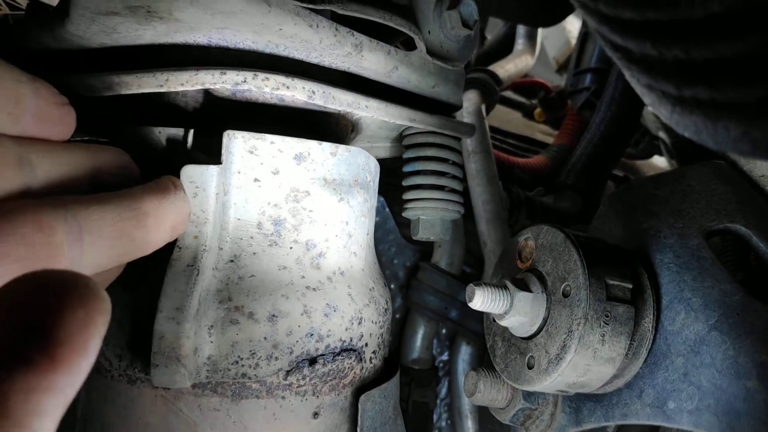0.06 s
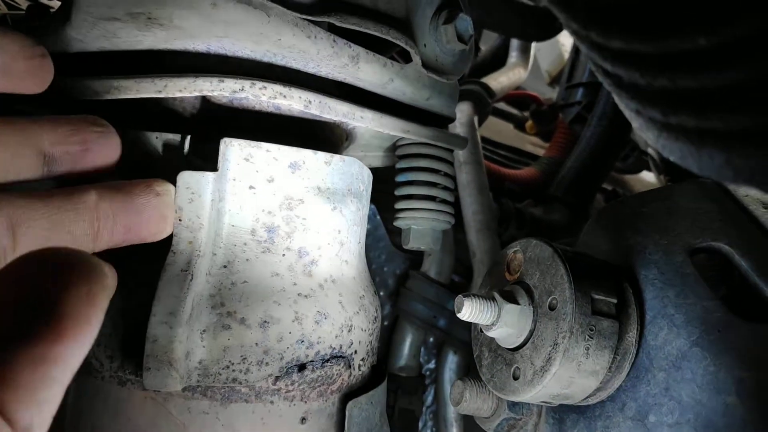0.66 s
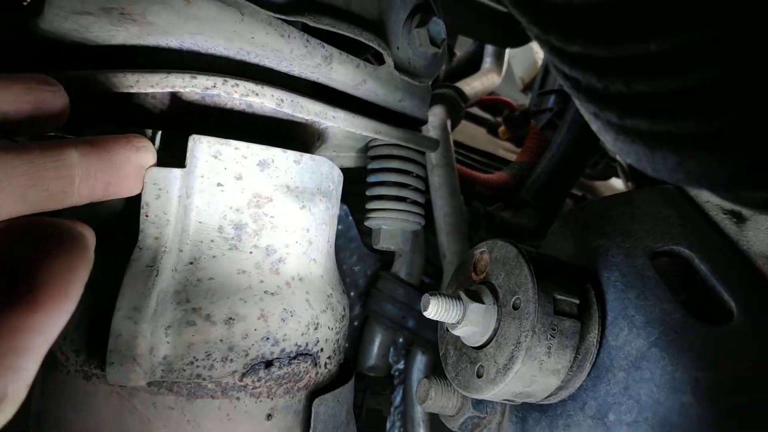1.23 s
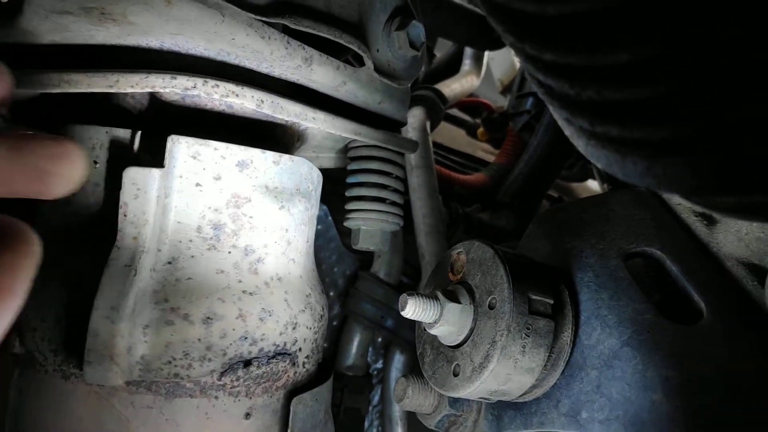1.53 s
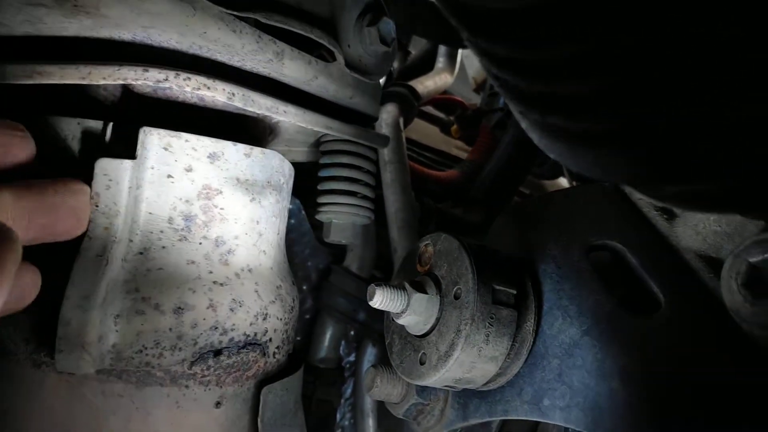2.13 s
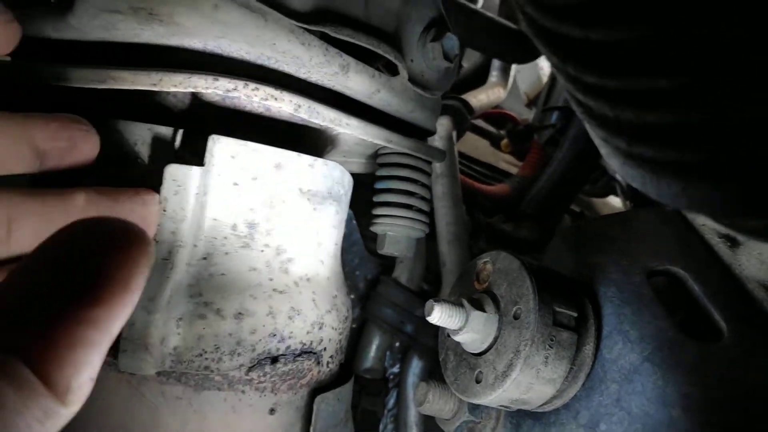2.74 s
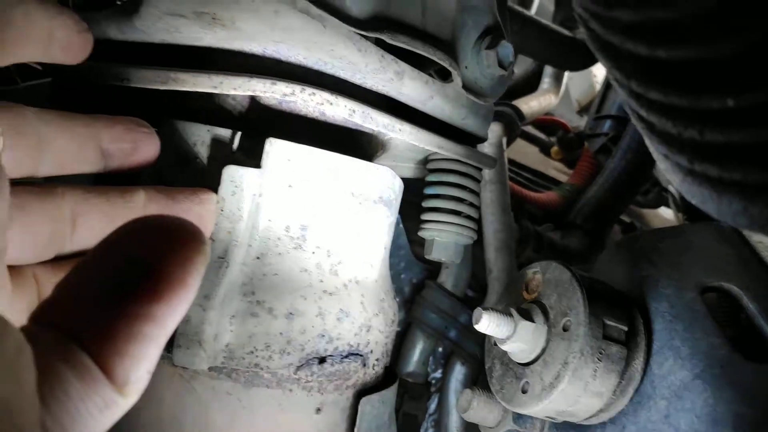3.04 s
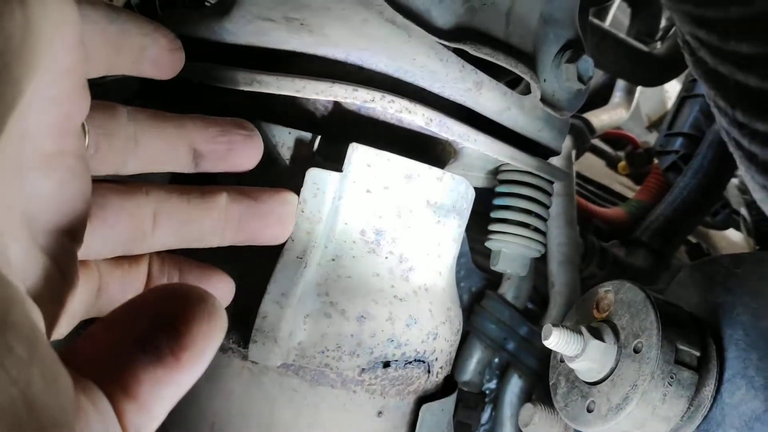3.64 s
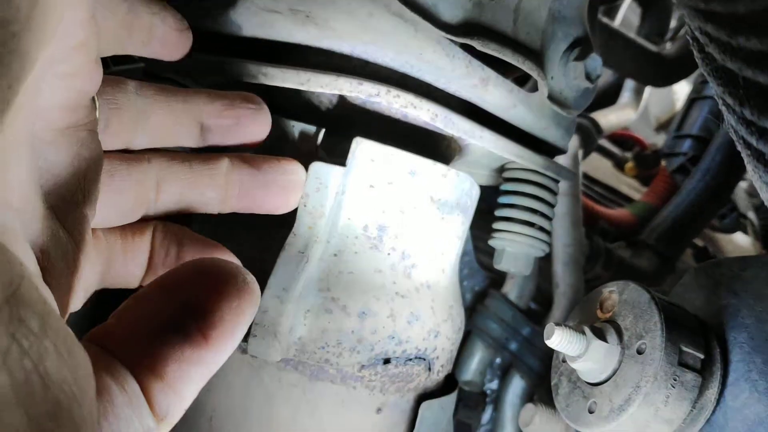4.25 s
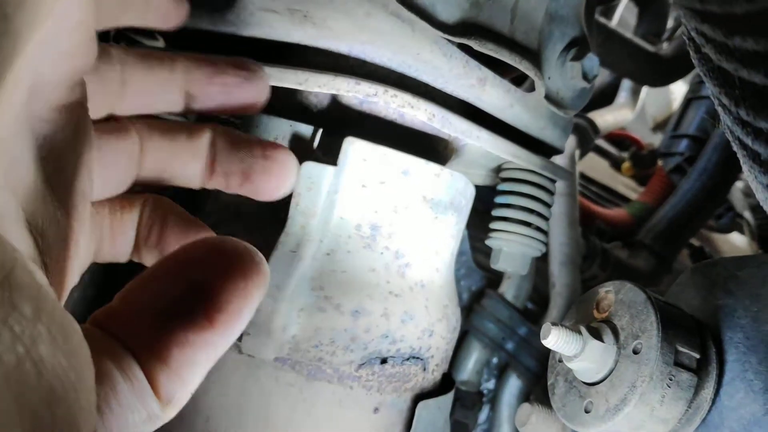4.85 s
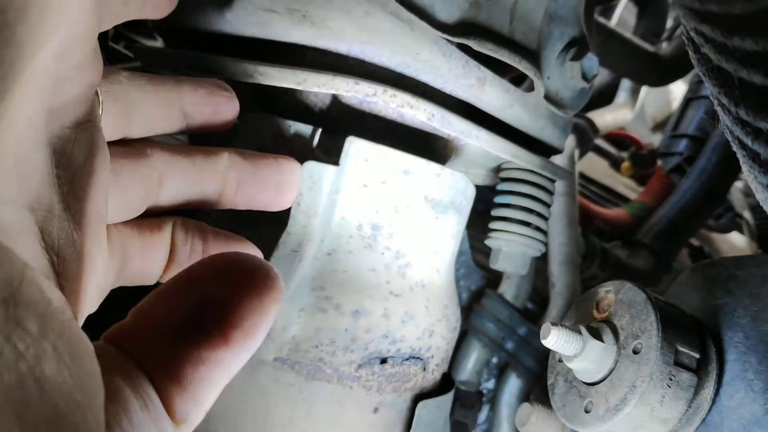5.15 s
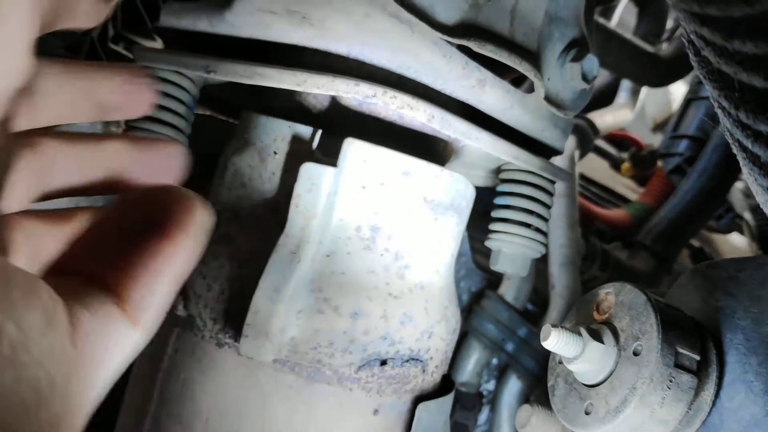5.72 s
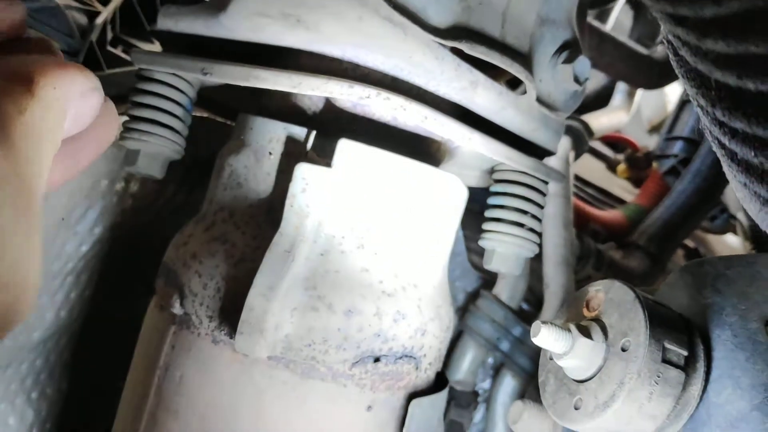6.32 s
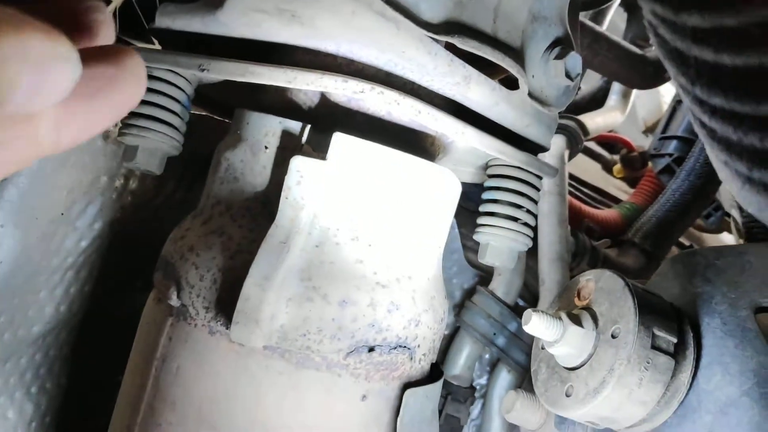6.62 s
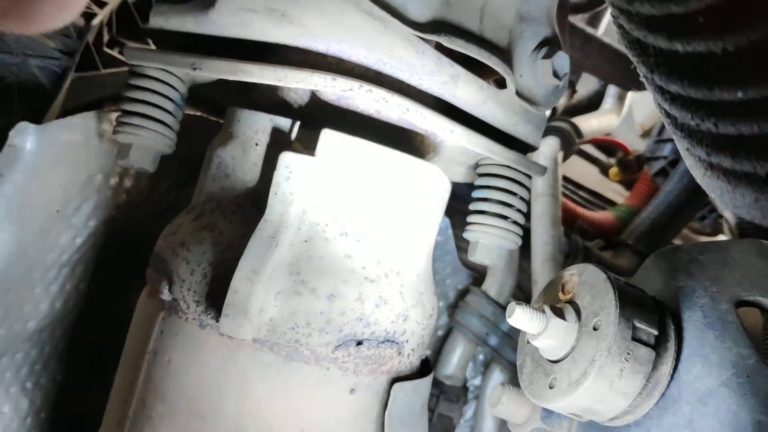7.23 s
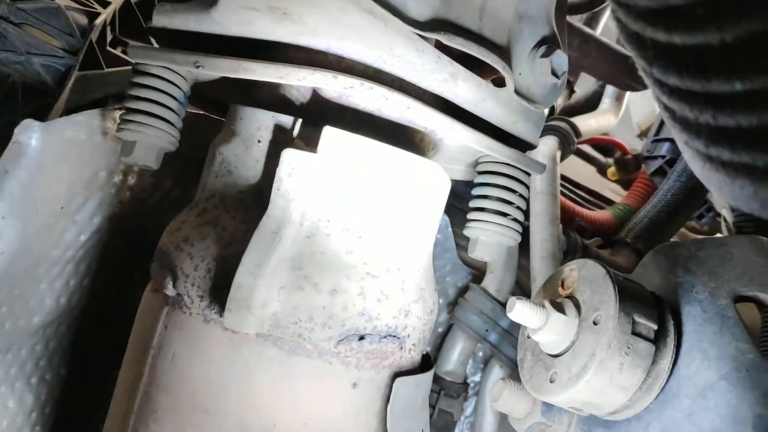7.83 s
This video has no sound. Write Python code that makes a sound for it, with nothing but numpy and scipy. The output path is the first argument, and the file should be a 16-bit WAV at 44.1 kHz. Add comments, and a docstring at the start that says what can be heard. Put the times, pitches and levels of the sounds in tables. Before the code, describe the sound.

Under a car, a fingernail flicks a loose, thin metal heat shield close to the microphone. Three sharp, ringing clangs come with uneven gaps, then after a pause four more follow about half a second apart. Most carry a quick chatter as the sheet slaps the exhaust pipe. Afterwards a sleeve rustles softly as the arm draws back. A faint low rumble and hum continue throughout.

```python
"""Flicked exhaust heat shield

Under a car, a fingernail flicks the loose shield and rings the thin sheet. After a hard flick the sheet
slaps the pipe behind it and chatters, and both ring on. The finger brushes the metal and once skids off.
A sleeve rustles as the arm draws back; rumble, hum and faint squeaks lie below. A limiter ducks peaks."""
import sys
import numpy as np
from scipy import signal
from scipy.fft import rfft, irfft, next_fast_len
from scipy.io import wavfile
from scipy.ndimage import uniform_filter1d, minimum_filter1d, map_coordinates

SR = 44100
rng = np.random.default_rng(int(sys.argv[2]) if len(sys.argv) > 2 else 0)


def waveform_to_disk(signal):
    """Save audio, clipped to [-1, 1], as 16-bit WAV at the path in sys.argv[1]."""
    frames = np.transpose(np.atleast_2d(signal))
    scaled = np.clip(frames, -1, 1) * 32767
    samples = np.round(scaled).astype(np.int16)
    wavfile.write(sys.argv[1], SR, samples)


N = 351918
TOP_HZ = 14250

# Nail strikes. Each row: start in seconds, level in dB, brightness in dB/octave, favoured band in Hz.
NAIL_FLICKS = [(0.49, -32.5, -1.5, 7400), (0.8191, -5.5, 3, 9360), (1.5223, -22.5, -1.5, 4830),
               (1.5301, -1.5, 0, 4080), (1.822, -35.5, 1.5, 8000), (1.992, -25, -1, 2323),
               (2.463, -0.5, 2, 12540), (3.7952, -4.5, -1, 8100), (4.333, -4, -0.5, 7600),
               (4.8174, -3.5, 0, 7070), (5.3405, -5.5, 8, 7620)]
# Stereo width. Each row: frequency in Hz, angle between the channels in radians.
STEREO_SPREAD = [(200, .25), (600, .9), (1100, 1.2), (2200, 1.75), (4700, 1.77), (8000, 1.9), (14000, 0.65)]
# Rubbing of cloth or skin. Each row: frequency in Hz, relative density in dB.
RUB_SPECTRUM = [(1470, -7), (2500, -10.5), (4880, -9.5), (5570, -9.5), (6000, -6), (7930, -1), (10300, -11),
                (13700, -10.5), (14500, -7)]
# Its balance. Each row: frequency in Hz, left over right in dB.
RUB_PAN = [(2000, -6), (4400, -5.5), (8000, -14), (13000, 7.5)]


def amp(db):
    """Decibels to gain."""
    return 10 ** (np.asarray(db) / 20)


def unit(x):
    """Scale to rms 1."""
    return x / np.sqrt(np.mean(x ** 2) + 1e-20)


def along(points, hz):
    """Read (Hz, value) points on a log axis."""
    f, v = np.transpose(points)
    return np.interp(np.log(hz + 1), np.log(f + 1), v)


def wobble(rate_hz):
    """Smooth random curve, rate_hz knots a second."""
    knots = rng.standard_normal(int(N * rate_hz / SR) + 4)
    return map_coordinates(knots, [np.arange(N) * rate_hz / SR])


def filtered(x, response):
    """Apply a gain given as a function of Hz."""
    n = x.shape[-1]
    m = next_fast_len(n + 8192)
    return irfft(rfft(x, m) * response(np.fft.rfftfreq(m, 1 / SR)), m)[..., :n]


def panned(db):
    """Left and right gains of mean power 1."""
    g = amp([db / 2, -db / 2])
    return g / np.sqrt(np.mean(g ** 2, axis=0))


def noise(spectrum, n, pan=((1000, 0),)):
    """Stereo noise of rms 1: alike in the bass, wider in the treble."""
    def mid_side_gains(hz):
        angle = np.minimum(along(STEREO_SPREAD, hz), np.pi / 2) / 2
        return np.array([np.cos(angle), np.sin(angle)])

    mid, side = filtered(rng.standard_normal((2, n)), mid_side_gains)
    stereo = np.array([mid + side, mid - side])
    return unit(filtered(stereo, lambda hz: amp(along(spectrum, hz)) * panned(along(pan, hz))))


def burst(spectrum, t60_s):
    """Decaying noise with a spectrum of (Hz, dB) points."""
    t = np.arange(SR // 5) / SR
    return noise(spectrum, len(t)) * amp(-60 * t / t60_s)


def colour_db(hz, tilt_db_oct, favoured_hz, favour_db=4, width_oct=0.27):
    """Each contact has its own brightness; the spot where it lands favours one band."""
    tilt_db = tilt_db_oct * np.log2(np.maximum(hz, 1000) / 4000)
    return tilt_db + favour_db * np.exp(-.5 * (np.log2(hz / favoured_hz) / width_oct) ** 2)


def add(track, start_s, sound):
    """Mix a sound into the track."""
    part = track[:, max(round(start_s * SR), 0):][:, :sound.shape[-1]]
    part += sound[..., :part.shape[1]]


def background(settle_s=1.7):
    """Rumble that starts louder and settles, open air, and a distant machine's wavering hum."""
    # Noise spectra. Each row: frequency in Hz, relative density in dB.
    rumble_spectrum = [(15, -5), (27, 3.5), (38, -1.5), (52, 6), (75, 0), (110, 0), (150, -12.5),
                       (220, -20.5), (400, -58)]
    air_spectrum = [(100, 1.5), (170, -2.5), (300, -3.5), (600, -11), (950, -9), (1500, -17), (2500, -27.5),
                    (4000, -32.5), (8000, -31), (14000, -38.5)]
    # Machine tones. Each row: frequency in Hz, level in dB.
    hum_tones = [(86.1, -60.5), (113, -56)]
    t = np.arange(N) / SR
    rumble = amp(-50.5 + 8.5 * np.exp(-t / settle_s) + 1.23 * wobble(4.2)) * noise(rumble_spectrum, N)
    air_db = np.interp(t, [0, 1.5, 3, 8], [-53.5, -54, -55, -56]) + 0.89 * wobble(5.3)
    out = rumble + amp(air_db) * noise(air_spectrum, N)
    for hz, db in hum_tones:
        peak = np.sqrt(2) * amp(db + 1.1 * wobble(4.5))
        out += peak * np.sin(2 * np.pi * hz * t + 0.84 * wobble(5.6))
    return out


def squeaks(pitch_arch=.09, roughness=.022):
    """Faint, unsteady squeaks whose pitch arches with their level."""
    # Each row: start in seconds, length in seconds, top pitch in Hz, level in dB.
    squeak_events = [(3.022, 0.267, 895, -59), (6.869, .3, 1645, -66)]
    out = np.zeros((2, N))
    for s, length_s, top_hz, db in squeak_events:
        arch = np.sin(np.linspace(0, np.pi, int(length_s * SR)))
        hz = top_hz * (1 - pitch_arch * (1 - arch) + roughness * wobble(146)[:len(arch)])
        add(out, s, amp(db) * arch * np.sin(2 * np.pi * np.cumsum(hz) / SR))
    return out


def pull_speed(n, peak_share=0.26):
    """One pull of the arm over n samples: picks up quickly, eases off."""
    progress = np.interp(np.linspace(0, 1, n), [0, peak_share, 1], [0, .5, 1])
    return np.abs(np.sin(np.pi * progress)) ** 0.77


def sleeve(crackles_per_s=26, stretched_at_s=6.8, flutter_db=1.2):
    """Cloth speed drives the hiss and, until the sleeve has stretched, the crackle of its folds."""
    # Arm pulls. Each row: start in seconds, length in seconds, level in dB, favoured band in Hz.
    pulls = [(5.742, 0.34, -60, 5960), (5.99, 0.22, -55, 7500), (6.16, 0.85, -53, 7500),
             (6.959, 0.3, -55, 7500), (7.217, .19, -52.5, 12000), (7.386, .12, -52, 13000),
             (7.519, 0.12, -52, 9030), (7.721, .045, -62.5, 7500)]
    hiss, speed = np.zeros((2, N)), np.zeros((1, N))
    for s, length_s, db, favoured_hz in pulls:
        slide = amp(db) * pull_speed(int(length_s * SR))
        cloth = filtered(noise(RUB_SPECTRUM, len(slide), RUB_PAN),
                         lambda hz: amp(colour_db(hz + 1, 0, favoured_hz, favour_db=3.5, width_oct=.48)))
        add(hiss, s, slide * unit(cloth))
        add(speed, s, slide)
    buckles = (rng.random(N) < crackles_per_s / SR) & (np.arange(N) / SR < stretched_at_s)
    folds = buckles * amp(3 + 3 * rng.standard_normal(N))
    snap = burst([(800, -18), (2000, 0), (3200, -3), (5000, 5), (7000, -19)], t60_s=0.019)
    crackle = signal.fftconvolve(folds * speed, snap, axes=1)[:, :N]
    return amp(flutter_db * wobble(45)) * hiss + crackle


def hand():
    """The fingertip brushes the shield; hand and cuff tick."""
    # Each row: start in seconds, length in seconds, level in dB.
    brushes = [(0.589, 0.053, -64.5), (1.122, .054, -58), (1.198, 0.24, -67), (1.823, .056, -57),
               (1.971, .05, -54), (4.076, 0.025, -58.5), (4.597, 0.048, -60.5), (5.105, 0.031, -62)]
    # Each row: start in seconds, base level in dB, offset of the lower band in dB.
    ticks = [(3.1552, -41.5, -9), (3.2236, -37.5, -15), (3.2949, -45, -11), (3.5357, -41, -7.5),
             (3.5693, -39, -6.5), (3.6092, -46, -7), (5.969, -42, -14), (6.0356, -32.5, -24),
             (6.2383, -42, -24), (6.78, -40, -10), (6.9133, -34.5, -32)]
    out = np.zeros((2, N))
    for s, length_s, db in brushes:
        n = int(length_s * SR)
        add(out, s, amp(db) * noise(RUB_SPECTRUM, n, RUB_PAN) * signal.windows.tukey(n, .5))
    for s, db, low_db in ticks:
        high = burst([(1500, -12), (3500, 16.5), (8000, 15), (14000, 5)], t60_s=0.018)
        low = burst([(500, -37), (1500, 5), (2600, -6), (5000, -23)], t60_s=0.017)
        add(out, s, amp(db - 5.5) * high + amp(db + low_db + 5.5) * low)
    return out


def finger_slip(start_s=1.408, rise_s=0.0057, t60_s=0.57):
    """The finger skids off the rim: a dull snap and a rough, falling rub."""
    out, t = np.zeros((2, N)), np.arange(SR // 5) / SR
    pitch_hz = 990 + 220 * np.exp(-t / .025)
    grip = unit(wobble(280)[:len(t)]) + 1j * unit(wobble(273.2)[:len(t)])
    envelope = (1 - np.exp(-t / rise_s)) * amp(-60 * t / t60_s)
    rub = envelope * np.real(grip * np.exp(2j * np.pi * np.cumsum(pitch_hz) / SR))
    snap = burst([(300, -18.5), (1200, 4.5), (2500, 13.5), (3500, 1), (6500, 9.5), (10000, -6.5),
                  (14000, -15)], t60_s=0.19)
    add(out, start_s, amp(-34.5) * rub * panned(-11.5)[:, None] + amp(-33) * snap)
    return out


def slaps(swing_s=.0185, rebound_loss_db=13.5):
    """The loose sheet hits the pipe, then swings back for two weaker, slightly brighter rebounds."""
    # Each row: start in seconds, level in dB, brightness in dB/octave, favoured band in Hz,
    # transfer to the pipe in dB, first rebound relative to the slap in dB, rebounds' band in Hz.
    first_slaps = [(.827, -7, .5, 6940, -1.5, -6, 3898), (2.4713, -0.5, 1, 4820, -4, -8, 2017),
                   (3.807, -8, 1, 1920, 0, -7, 2280), (4.3422, -2.5, 2.5, 6580, -1, -5.5, 2300),
                   (4.8251, -3.5, 1.5, 6670, -3, -3.5, 5100), (5.3468, -2, 1, 7100, 0, -4.5, 477)]
    hits = []
    for s, db, tilt, favoured_hz, transfer_db, rebound_db, rebound_hz in first_slaps:
        hits.append((s, db, tilt, favoured_hz, transfer_db))
        for k in range(2):
            level_db = db + rebound_db - k * rebound_loss_db
            hits.append((s + (k + 1) * swing_s, level_db, tilt + 0.5, rebound_hz, transfer_db))
    return hits


def ring(hz, t60_s, pan_db, blows, clock_s, scatter_db=3, rise_s=.0025, jolt_cycles=0.253):
    """One mode stores the energy of its (s, dB) blows and leaks it; the channels hear it out of step."""
    # Each row: frequency in Hz, phase lag of the left channel in radians.
    left_lag = [(200, .2), (780, 1.2), (1100, 2.3), (2150, 4.98), (4700, 4.22), (7400, 8.3), (8400, 7.4),
                (14000, 12)]
    s, db = np.transpose(blows)
    at = np.round(s * SR).astype(int)
    energy = np.bincount(at, amp(db + scatter_db * rng.standard_normal(len(s))) ** 2, N)
    retained, rise = amp(-60 / (t60_s * SR)) ** 2, np.exp(-1 / (rise_s * SR))
    stored = signal.lfilter([1], [1, -retained], energy)
    # a blow that is strong against the running swing knocks its phase aside
    knocks = jolt_cycles * rng.standard_normal(len(s)) * np.sqrt(energy[at] / stored[at])
    drift = np.cumsum(np.bincount(at, knocks, N))
    power, shift = signal.lfilter([1 - rise], [1, -rise], [stored, drift])
    phase = 2 * np.pi * (hz * clock_s + shift + rng.random())
    return panned(pan_db)[:, None] * np.sqrt(power) * np.sin([phase, phase + along(left_lag, hz)])


def pipe_ring(clock_s):
    """The pipe and its housing ring with what the slaps pass on."""
    # Each row: frequency in Hz, gain in dB, t60 in seconds, left over right in dB.
    pipe_modes = [(284, -33.5, .69, 0), (393, -46.5, 0.66, 5.5), (424, -42, 1.5, 3.5), (491, -42, 0.7, -2),
                  (554, -45.5, 1.2, -2.5), (615, -39, 1.5, -2.5), (682, -35, .9, 1), (802, -28.5, .58, 6.5),
                  (899, -35.5, 0.98, -2.5), (1011, -37, 0.39, -14.5), (1103, -34, 0.38, -17.5),
                  (1344, -30, .32, 5), (1530, -46.5, 1.4, 0.5), (1540, -44, 2.1, -9), (1682, -37, 0.98, 0),
                  (1940, -38.5, .58, -5), (2156, -20, 0.27, 1), (2170, -47, 0.86, -3),
                  (2176.5, -46.5, 1.9, 1), (2204, -38.5, 0.46, 2), (2247, -24.5, 0.2, 8),
                  (2640, -36, .55, 4), (2870, -20, 0.15, 1), (2990, -42, .6, 5.5), (3200, -35.5, 0.32, 8),
                  (4150, -21, 0.11, 1), (4897, -9.5, 0.14, -0.5), (5430, -34, 0.24, -4),
                  (6740, -16.5, 0.16, -4), (10420, -16.5, 0.11, 6.5)]
    out = np.zeros((2, N))
    for hz, mode_db, t60_s, pan_db in pipe_modes:
        blows = [(s, db + transfer_db + mode_db + colour_db(hz, tilt, band_hz))
                 for s, db, tilt, band_hz, transfer_db in slaps()]
        out += ring(hz, t60_s, pan_db, blows, clock_s)
    return out


def shield_ring(clock_s):
    """The shield's strong modes, struck by both nail and pipe."""
    # Each row: frequency in Hz, slap gain in dB, t60 in seconds, left over right in dB, flick gain in dB.
    shield_modes = [(219.3, -39, 0.94, -3, -38.5), (663, -41.5, 0.94, 0, -47),
                    (972, -29, 0.77, -13.5, -45.5), (1085, -21, 0.41, -6.5, -45.5),
                    (1097, -21, 0.51, -9.5, -38), (1486, -36, 0.92, 6.5, -47.5),
                    (2005, -20, 0.16, 8, -33.5), (2150, -38, 0.64, 2, -44), (2477, -30.5, 0.18, -4, -29.5),
                    (2523, -28.5, 0.068, -3, -34), (2590, -21, 0.23, 3.5, -36), (3361, -24, .18, 2, -26),
                    (3420, -33.5, 0.23, 14.5, -43.5), (4476, -16.5, 0.092, -7, -44),
                    (4250, -18.5, 0.24, -2.5, -50.5), (4592, -19.5, 0.32, -9, -34),
                    (4781, -23.5, 0.35, -10, -26), (6410, -21, 0.13, 1.5, -39),
                    (7450, -22.5, 0.18, -8, -20.5), (7550, -24.5, .15, -1, -24),
                    (8040, -17, 0.15, -7.5, -26), (8360, -17, 0.044, -10.5, -28.5),
                    (9140, -27, 0.2, -2.5, -27.5), (11200, -18.5, 0.071, 8.5, -38.5),
                    (12000, -28.5, .11, 12, -29.5), (13000, -25, 0.098, 13, -41.5),
                    (8170, -17, 0.097, -6.5, -35.5), (9400, -28.5, 0.14, 1.5, -43),
                    (11350, -25.5, .12, 5.5, -45), (13650, -21, .1, 11, -39)]
    out = np.zeros((2, N))
    for hz, slap_db, t60_s, pan_db, flick_db in shield_modes:
        blows = [(s, db + flick_db + colour_db(hz, tilt, band_hz))
                 for s, db, tilt, band_hz in NAIL_FLICKS]
        blows += [(s, db + slap_db + colour_db(hz, tilt, band_hz))
                  for s, db, tilt, band_hz, _ in slaps()]
        out += ring(hz, t60_s, pan_db, blows, clock_s)
    return out


def dense_modes(count=330):
    """Impulse response of the sheet's crowd of weak modes; the high ones die first."""
    # Each row: frequency in Hz, relative density in dB.
    spectrum = [(150, -25.5), (300, -18), (600, -9.5), (1000, 1), (1600, -2), (2300, 2.5), (3200, 0.5),
                (4600, 3.5), (5700, -1), (6800, 6.5), (8200, 0), (9500, 0), (12000, -9.5), (14000, -2)]
    # Each row: frequency in Hz, t60 in seconds before random shortening.
    decay = [(200, 1), (900, 0.48), (2000, 0.28), (4500, .22), (7000, .16), (13000, 0.069)]
    # Each row: frequency in Hz, left over right in dB.
    balance = [(200, -0.5), (1000, -6.5), (2300, 1), (4500, -1.5), (8000, -6), (10500, 5), (13000, 8.5)]
    t = np.arange(SR * 2 // 3) / SR
    edges_hz = np.linspace(np.sqrt(250), np.sqrt(TOP_HZ), count + 1) ** 2
    out = np.zeros((2, len(t)))
    for low_hz, width_hz, place, turn, life in zip(edges_hz, np.diff(edges_hz), *rng.random((3, count))):
        hz = low_hz + width_hz * place
        t60_s = along(decay, hz) * (0.6 + 0.41 * life)
        phase = 2 * np.pi * turn + np.array([[0], [rng.choice([-1, 1]) * along(STEREO_SPREAD, hz)]])
        gain = np.sqrt(width_hz) * amp(along(spectrum, hz) + 11 * life) * panned(along(balance, hz))
        out += gain[:, None] * amp(-60 * t / t60_s) * np.sin(2 * np.pi * hz * t + phase)
    return out / out[:, :SR // 100].std()


def chatter(response, tilt_db_oct, favoured_hz, contact_s):
    """A contact is a burst of tiny impacts, each setting off the response."""
    t = np.arange(SR // 20) / SR
    force = rng.standard_normal(len(t)) * np.exp(-t / contact_s)
    force /= np.linalg.norm(force)
    force = filtered(force, lambda hz: amp(colour_db(hz + 1, tilt_db_oct, favoured_hz)))
    return signal.fftconvolve(response, force[None], axes=1)


def clangs():
    """The nail clicks and rings the shield alone; slaps smack and ring shield and pipe together."""
    sheet = dense_modes()
    clock_s = np.arange(N) / SR + 5e-6 * wobble(65)  # flexing bends the pitches a little
    out = shield_ring(clock_s) + pipe_ring(clock_s)
    for s, db, tilt, favoured_hz in NAIL_FLICKS:
        click = burst([(200, -12), (1500, -2), (4800, -9.5), (5800, -11), (7600, 4.5), (10000, -2.5),
                       (14000, -3)], t60_s=0.054)
        add(out, s, amp(db - 20.5) * chatter(click, tilt, favoured_hz, contact_s=0.0019))
    for s, db, tilt, favoured_hz, _ in slaps():
        add(out, s, amp(db - 9) * chatter(sheet, tilt, favoured_hz, contact_s=0.0034))
        smack = burst([(80, -14.5), (250, -5), (2000, 6.5), (7000, 1), (14000, -5.5)], t60_s=.04)
        add(out, s, amp(db - 7) * chatter(smack, tilt, favoured_hz, contact_s=.001))
    return out


def scene():
    """Everything heard under the car."""
    return clangs() + finger_slip() + hand() + sleeve() + squeaks() + background()


def record(dry, ceiling_db=-4, release_db_per_s=95):
    """A limiter ducks just ahead of each peak and recovers steadily; a steep low-pass follows."""
    over_db = np.maximum(20 * np.log10(np.abs(dry).max(axis=0) + 1e-9) - ceiling_db, 0)
    recovery_db = release_db_per_s * np.arange(N) / SR
    gain_db = recovery_db - np.maximum.accumulate(over_db + recovery_db)
    gain_db = uniform_filter1d(minimum_filter1d(gain_db, size=32), size=64)
    return filtered(dry * amp(gain_db), lambda hz: amp(-np.clip((hz - TOP_HZ) / 13, 0, 120)))


dry = scene()
out = record(dry)
waveform_to_disk(out)
```